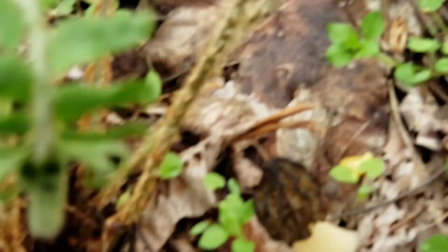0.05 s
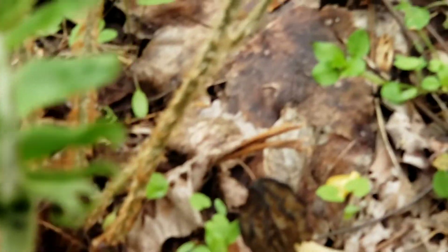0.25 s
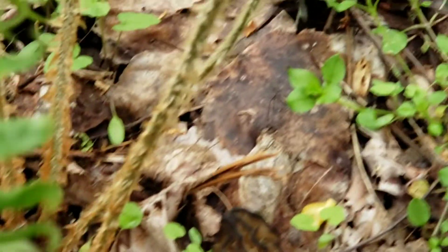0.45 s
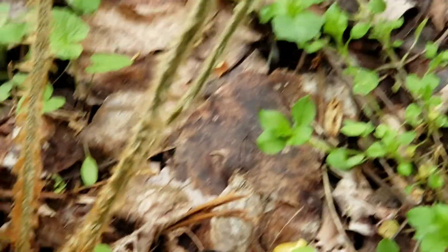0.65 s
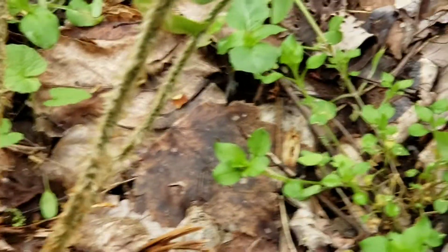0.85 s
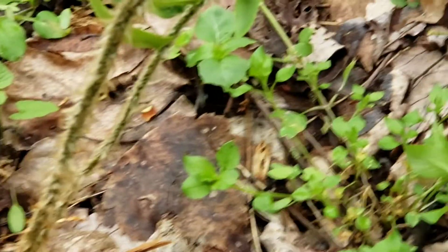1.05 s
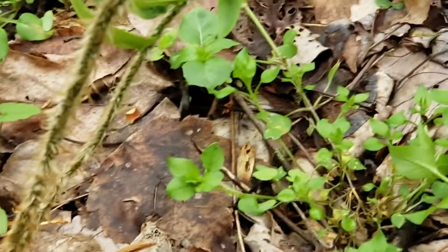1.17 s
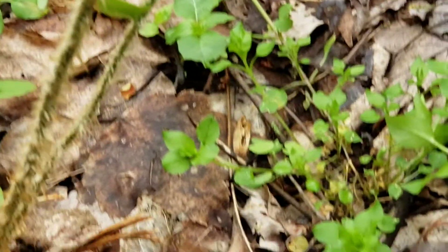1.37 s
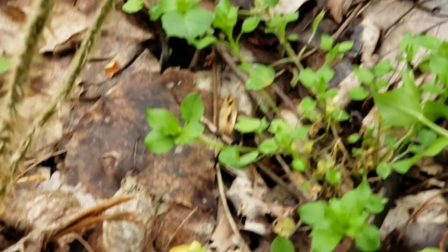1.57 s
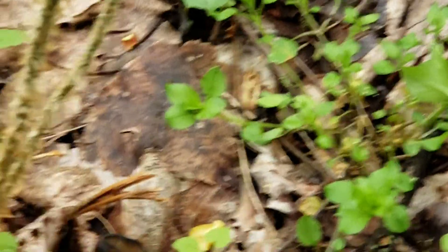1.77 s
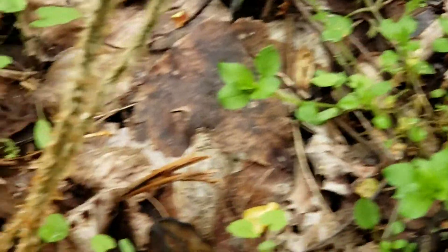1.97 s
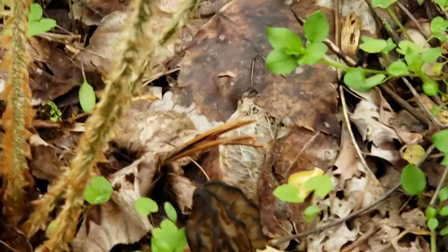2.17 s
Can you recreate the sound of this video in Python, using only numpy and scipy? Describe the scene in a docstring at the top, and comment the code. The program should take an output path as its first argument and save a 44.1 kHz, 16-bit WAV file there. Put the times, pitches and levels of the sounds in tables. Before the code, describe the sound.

Close, crisp rustling of dry leaf litter as a person shifts their weight: a few light ticks, then swelling crunches with bright snaps and dull stick cracks, over very quiet outdoor forest air.

```python
"""Dry leaf litter and low plants, close to the microphone, as someone shifts their weight through them.
The leaves crumple in thousands of tiny random clicks a second, each ringing a bank of short resonances;
stalks and brittle leaves snap out of the rustle as timed cracks with splinters and a short ring.
Shaped noise gives the soft ground underfoot, the dull sticks and the rumble of the hand-held microphone.
Behind lies quiet forest air, with a faint, thin, far tone that fades early on."""
import sys
import numpy as np
from scipy import signal
from scipy.fft import rfft, irfft, next_fast_len
from scipy.io import wavfile

SR = 44100
rng = np.random.default_rng(int(sys.argv[2]) if len(sys.argv) > 2 else 0)


def put_to_file(sound):
    """Save the sound as 16-bit audio at rate SR, in the file named by the first command-line argument."""
    columns = np.atleast_2d(sound).T  # one column per channel
    safe = np.clip(columns, -1, 1)
    whole_steps = np.round(safe * 32767)
    wavfile.write(sys.argv[1], SR, whole_steps.astype(np.int16))


N = 97769
TIME = np.arange(N) / SR   # seconds

# Level of the crumpling leaves, before trims and side colour. Each row: time in seconds, crunch in dB,
# treble at the left in dB, treble at the right in dB.
CRUMPLE_LEVEL = [(0.0, -46.5, -48.5, -44), (0.01, -60.5, -58.5, -60), (0.3, -54.5, -49, -50),
                 (0.34, -56.5, -54.5, -53), (0.41, -54, -52, -53), (0.43, -55.5, -57, -56),
                 (0.47, -55.5, -55, -58), (0.5, -49, -51.5, -48), (0.61, -62.5, -56, -54),
                 (0.65, -56.5, -59, -57), (0.7, -41, -46.5, -41), (0.73, -47, -55, -42),
                 (0.77, -43.5, -43, -47), (0.82, -40.5, -38.5, -28), (0.84, -42.5, -41.5, -34),
                 (0.91, -38.5, -37.5, -36.5), (0.98, -40, -40, -37), (1.07, -36, -40.5, -35),
                 (1.19, -43.5, -40.5, -39), (1.25, -35, -40.5, -36), (1.33, -45, -46, -47),
                 (1.43, -44, -48, -43), (1.58, -32.5, -35.5, -33), (1.69, -49.5, -54, -49),
                 (1.76, -49, -47, -47), (1.8, -41, -49.5, -40), (1.94, -45, -43.5, -39.5),
                 (1.97, -33, -31.5, -42), (2.03, -32.5, -43.5, -47), (2.04, -42.5, -40, -32),
                 (2.1, -41, -46, -37), (2.2, -52.5, -56, -50)]
FRACTURES_PER_S, FRACTURE_SPREAD_DB = 2600, 3
CLUMP_DB, CLUMP_RATE_HZ = 2.5, 128   # depth and speed at which the fractures bunch together
CRUNCH_TRIM_DB, TREBLE_TRIM_DB = -2.33, -2.45
SLIDE_DB = -2.5   # smooth sliding of leaf on leaf against the fractures

# How a leaf fracture is spread over pitch
CRUNCH_TOP_HZ, TREBLE_FROM_HZ = 5370, 10200   # the two levels blend in between
BAND_SPREAD_DB = 3.5   # every crumpling fracture favours other pitches
PATCH_DB, PATCH_RATE_HZ = 1.97, 20.5   # the colour shifts as different leaves take the load
SCATTER_DB, SCATTER_S = -5.5, 0.0024   # sound scattered in the litter after each click; its decay time
SAME_SIGN = .65   # likeness of the click's sign at left and right

# Stalks and brittle leaves that snap, before trims and colour. Each row: start in seconds,
# pitch of the ring in Hz, crunch in dB, treble at the left in dB, treble at the right in dB.
SNAPS = [(0.1842, 4860, -21, -19, -14), (0.3677, 4440, -28, -25, -25), (0.4226, 4070, -31, -23, -28),
         (0.4364, 3750, -10.5, -8, -0.5), (0.4392, 3650, -16.5, -18, -21), (0.549, 7000, -25, -21.5, -16),
         (0.6323, 4100, -19.5, -19.5, -11), (0.651, 7460, -18, -20, -12.5), (0.7259, 2540, -10.5, -10, -7),
         (0.7412, 7820, -24, -18, -11), (0.7633, 4500, -5, -3.5, -1), (0.7684, 2200, -13, -27, -16),
         (0.8124, 7710, -11, 2.5, 1), (0.8143, 4130, -10, -4, -8), (0.817, 2670, -7, -11, -4),
         (0.8593, 7820, -20, -10.5, -19), (0.914, 7900, -14, -7, -4), (0.9359, 7900, -17, -2, -2),
         (0.9524, 4000, -8, -16, -8), (1.0061, 8300, -7, -12, 1), (1.0097, 7620, -16, -1.5, -7),
         (1.0461, 4410, -16, -9, -11), (1.0603, 8000, -5, -0.5, -1), (1.2667, 1950, -11.5, -19, -15),
         (1.2914, 3820, -9.5, -19, -11), (1.3029, 3900, -14, -17, -21), (1.3555, 3920, -14.5, -37, -17),
         (1.3731, 7800, -18, -15.5, -16), (1.4494, 7400, -13.5, -20, -18), (1.4751, 4030, -15, -22, -21),
         (1.7921, 2480, -23, -8, -4), (1.8519, 5000, -4.5, -7, -4), (1.8658, 4760, -10, -34, -6.5),
         (1.9651, 2000, -7, -5, 7.5), (1.973, 8030, -21, -21, -3), (1.993, 2070, -16, -7, -7),
         (2.0053, 3100, -1.5, -1, -2), (2.0114, 7100, -6.5, 2.5, 12), (2.0344, 3070, -5, -3.5, 6),
         (2.1002, 4360, -10, -14, -11), (2.1381, 4270, -25, -21, -6), (2.1614, 1870, -11.5, -34, -9)]
# Colour of the snaps. Each row: frequency in Hz, level in dB.
SNAP_COLOUR = [(500, -3), (1300, -5), (2100, -0.5), (3100, -3), (4000, 2), (5300, 3), (7000, 1), (10000, 0),
               (16000, .5)]
SNAP_CRUNCH_TRIM_DB, SNAP_TREBLE_TRIM_DB = -5.5, -4.5
FORECRACK_DB, FORECRACK_S = -12, .0012   # a first fibre gives this long ahead of the snap
SPLINTERS, SPLINTER_DB, SPLINTER_S = 5, -6, .0011   # smaller cracks per snap; level; mean delay
RING_DB, RING_S = -22, 0.0038   # ring against the snap's crunch level; time until 60 dB down

# Colour of the leaves as each side hears them. Each row: frequency in Hz, level in dB.
LEFT_COLOUR = [(500, -16.5), (800, -11.5), (1100, -5), (1550, -8.5), (2100, -2.5), (3100, -2), (5600, -.5),
               (7700, 2), (9300, 1), (11000, 6.5), (12500, 12.5), (14200, 12.5), (15800, 1)]
RIGHT_COLOUR = [(500, -25), (800, -16), (1100, -5.5), (1600, -1), (2100, 4.5), (3200, 2.5), (4300, 4.5),
                (5600, -3.5), (7000, -6), (8200, -4), (9700, -2.5), (12500, -5), (14200, -6), (15800, 4)]
RIGHT_LAG_S = 0.0003736   # the litter reaches the right side this much later

# Crushing of the lower layers of litter, before trim and pan. Each row: time in seconds, level in dB.
DEEP_LEVEL = [(0.0, -65.5), (0.3, -86), (0.33, -61), (0.48, -77), (0.51, -61), (0.59, -92), (0.7, -80),
              (0.71, -67), (1.02, -65), (1.09, -50), (1.19, -57.5), (1.25, -51), (1.27, -71), (1.44, -65),
              (1.57, -54.5), (1.76, -63.5), (1.78, -46.5), (1.83, -57.5), (1.86, -52), (1.89, -60),
              (1.98, -48.5), (2.22, -65)]
# Colour of the deep crunch. Each row: frequency in Hz, level in dB.
DEEP_COLOUR = [(300, -24), (600, -12), (850, -3), (1100, 1), (1400, -1), (1800, -4.5), (2400, -8.5),
               (4000, -31)]
DEEP_PER_S, DEEP_SPREAD_DB = 1800, 5
DEEP_TRIM_DB, DEEP_PAN_DB = 1, -1   # the pan is added at the left, taken off at the right

# The foot pressing the soft ground, before trim and pan. Each row: time in seconds, level in dB.
PRESS_LEVEL = [(0.0, -65), (0.23, -74), (0.31, -73.5), (0.34, -63.5), (0.49, -68.5), (0.5, -61),
               (0.59, -74.5), (0.72, -64.5), (0.83, -56.5), (0.86, -58), (1.09, -51.5), (1.19, -57.5),
               (1.49, -55.5), (1.51, -50.5), (1.58, -53), (1.71, -65.5), (1.77, -63), (1.94, -58),
               (2.0, -52.5), (2.2, -67)]
# Colour of the ground. Each row: frequency in Hz, level in dB.
GROUND_COLOUR = [(60, -4.5), (130, 0.5), (250, -0.5), (450, 0.5), (650, -4), (1000, -11.5), (1600, -18.5),
                 (3000, -42)]
PRESS_TRIM_DB, PRESS_PAN_DB = -1.5, 1.35

# Damp sticks crunching under the litter. Each row: start in seconds, pitch in Hz, level in dB.
DULL_CRUNCHES = [(.33, 866, -62), (.715, 190, -60.5), (1.085, 1390, -48), (1.32, 334, -59),
                 (1.365, 336, -56), (1.655, 650, -58), (1.775, 850, -51), (1.79, 1400, -53),
                 (1.86, 189, -58)]
DULL_ATTACK_S, DULL_DECAY_S, DULL_Q = 0.0033, 0.02, 4.3

# Handling of the microphone. Each row: time in seconds, level in dB.
HANDLING_LEVEL = [(0.0, -77), (0.29, -69), (0.31, -60), (0.5, -73.5), (0.76, -68), (0.82, -78),
                  (1.08, -57.5), (1.12, -69), (1.33, -56), (1.35, -63), (1.51, -80), (1.52, -55),
                  (1.65, -59.5), (1.76, -73.5), (2.01, -53.5), (2.2, -69.5)]
# Colour of the handling rumble. Each row: frequency in Hz, level in dB.
RUMBLE_COLOUR = [(15, -32), (30, -18), (55, 0.5), (85, 0.5), (130, -10), (250, -29), (600, -47)]

# Faint, thin tone far away, fading. Each row: time in seconds, level in dB.
FAR_TONE_LEVEL = [(0, -67.5), (.38, -72), (.55, -93), (2.2, -93)]
FAR_TONE_HZ, FAR_TONE_WIDTH_HZ = 1305, 66

# Colour of the distant forest air. Each row: frequency in Hz, level in dB.
AIR_COLOUR = [(30, 2), (90, -5), (250, -19), (450, -9), (750, -24), (1150, -5), (1500, -7), (2200, 1),
              (2700, -9), (3300, -15.5), (8000, -15), (16000, -15)]
AIR_DB, AIR_PAN_DB = -65.5, -5.2

CUTOFF_HZ = 16100


def from_db(db):
    """Decibels to gain."""
    return 10 ** (np.asarray(db) / 20)


def rms_one(x):
    """Scale to unit power."""
    return x / np.sqrt(np.mean(x ** 2) + 1e-20)


def in_time(rows):
    """The level columns of a curve, sample by sample."""
    seconds, *columns = np.transpose(rows)
    return np.array([np.interp(TIME, seconds, column) for column in columns])


def pan(db):
    """Decibels to add at the left and take off at the right."""
    return db * np.array([[1], [-1]])


def later_at_right(x):
    """The same sound, delayed by its longer way to the right side."""
    return np.interp(TIME - RIGHT_LAG_S, TIME, x)


def drift(rate_hz):
    """Slow chance with rms 1: noise through two equal low-passes, taken once they have settled."""
    r = np.exp(-2 * np.pi * rate_hz / SR)
    slow = signal.lfilter([1], [1, -2 * r, r * r], rng.standard_normal(2 * N))
    return rms_one(slow[N:])


def colour(x, points):
    """Causal (minimum-phase) filter that follows a spectrum, so that clicks stay sharp."""
    size = 2 * next_fast_len(N)
    hz, db = np.transpose(points)
    grid = np.maximum(np.arange(size // 2 + 1) * SR / size, 1)
    gain = from_db(np.interp(np.log(grid), np.log(hz), db))
    cepstrum = irfft(np.log(gain))
    # folding the cepstrum onto positive times gives the minimum phase
    cepstrum[1:size // 2] *= 2
    cepstrum[size // 2 + 1:] = 0
    response = np.exp(rfft(cepstrum))
    return irfft(rfft(x, size) * response)[..., :N]


def stereo_noise(points, alike):
    """Coloured noise, partly shared by both sides; rms 1."""
    mid, side = rng.standard_normal((2, N))
    mid, side = np.sqrt(1 + alike) * mid, np.sqrt(1 - alike) * side
    return rms_one(colour(np.array([mid + side, mid - side]), points))


def resonance(x, hz, width_hz):
    """One resonance, gain 1 at its top."""
    r = np.exp(-np.pi * width_hz / SR)
    zeros = np.array([1, 0, -1]) * (1 - r * r) / 2
    poles = [1, -2 * r * np.cos(2 * np.pi * hz / SR), r * r]
    return signal.lfilter(zeros, poles, x)


def scatter(clicks):
    """Level of the few milliseconds of diffuse sound behind every click."""
    r = np.exp(-1 / (SCATTER_S * SR))
    power = signal.lfilter([1 - r], [1, -r], clicks ** 2 + 1e-18)
    return from_db(SCATTER_DB) * np.sqrt(power)


def fractures(crunch, treble, spread_db, slide_crunch=0, slide_treble=0):
    """Each click rings a bank of short leaf resonances at its own strengths and signs; sliding adds noise."""
    edges = np.geomspace(400, 17000, 14)   # band edges in Hz
    haze_crunch = np.hypot(scatter(crunch), slide_crunch)
    haze_treble = np.hypot(scatter(treble), slide_treble)
    out = np.zeros((2, N))
    for low, high in zip(edges, edges[1:]):
        centre = np.sqrt(low * high)
        up = np.log(centre / CRUNCH_TOP_HZ) / np.log(TREBLE_FROM_HZ / CRUNCH_TOP_HZ)
        up = np.clip(up, 0, 1)   # 0: crunch level, 1: treble level
        strength = rms_one(from_db(spread_db * rng.standard_normal(N))) * rng.choice([-1, 1], N)
        right_sign = np.where(rng.random(N) < (1 + SAME_SIGN) / 2, 1, -1)
        sides = np.array([np.ones(N), right_sign])
        drive = crunch ** (1 - up) * treble ** up * strength * sides
        drive += haze_crunch ** (1 - up) * haze_treble ** up * rng.standard_normal((2, N))
        drive *= rms_one(from_db(PATCH_DB * drift(PATCH_RATE_HZ)))
        band = signal.butter(2, [low, high], "band", fs=SR, output="sos")
        out += signal.sosfilt(band, drive)
    return out


def crumpling():
    """Clumps of tiny fractures, mostly small and a few large, over the hiss of sliding leaves."""
    level = in_time(CRUMPLE_LEVEL)
    born = rng.random(N) < FRACTURES_PER_S / SR
    clumps = rms_one(from_db(CLUMP_DB * drift(CLUMP_RATE_HZ)))
    sizes = from_db(FRACTURE_SPREAD_DB * np.minimum(rng.exponential(1, N), 4.5))
    clicks = clumps * rms_one(born * sizes)
    crunch = from_db(level[0] + CRUNCH_TRIM_DB)
    treble = from_db(level[1:] + TREBLE_TRIM_DB)
    slide = from_db(SLIDE_DB) * clumps
    return fractures(crunch * clicks, treble * clicks, BAND_SPREAD_DB, crunch * slide, treble * slide)


def snapping():
    """A first fibre gives, then comes one sharp crack, and the piece tears on in a few splinters."""
    clicks = np.zeros((3, N))   # crunch, treble at the left, treble at the right
    delays = SPLINTER_S * rng.exponential(1, (len(SNAPS), SPLINTERS))
    for (start, _, *db), later in zip(SNAPS, delays):
        crack = from_db(db)
        clicks[:, int(start * SR)] += crack
        clicks[:, int((start - FORECRACK_S) * SR)] += crack * from_db(FORECRACK_DB)
        for delay in later:
            clicks[:, min(int((start + delay) * SR), N - 1)] += crack * from_db(SPLINTER_DB)
    crunch = from_db(SNAP_CRUNCH_TRIM_DB) * clicks[0]
    treble = from_db(SNAP_TREBLE_TRIM_DB) * clicks[1:]
    return colour(fractures(crunch, treble, spread_db=1.5), SNAP_COLOUR)


def snap_rings():
    """Each broken piece rings for a moment at its own pitch, a sine that decays exponentially."""
    out = np.zeros(N)
    for start, hz, crunch_db, *_ in SNAPS:
        first = int(start * SR)
        age = TIME[:min(SR // 20, N - first)]
        envelope = from_db(crunch_db + RING_DB - 60 * age / RING_S)
        out[first:first + len(age)] += envelope * np.sin(2 * np.pi * hz * age)
    return out


def leaves():
    """The leaves lie to the left: they reach the right side later, and each side has its own colour."""
    left, right = crumpling() + snapping() + snap_rings()
    return np.array([colour(left, LEFT_COLOUR), later_at_right(colour(right, RIGHT_COLOUR))])


def deep_crunch():
    """Muffled fractures in the packed leaves below: coloured random clicks, with diffuse noise around."""
    sizes = from_db(DEEP_SPREAD_DB * np.minimum(rng.exponential(1, N), 4)) * rng.choice([-1, 1], N)
    born = rng.random(N) < DEEP_PER_S / SR
    direct = rms_one(colour(sizes * born, DEEP_COLOUR))
    diffuse = from_db(-5) * stereo_noise(DEEP_COLOUR, alike=0)
    both = np.array([direct, later_at_right(direct)]) + diffuse
    return from_db(in_time(DEEP_LEVEL) + DEEP_TRIM_DB + pan(DEEP_PAN_DB)) * rms_one(both)


def ground():
    """Damp litter gives under the foot in soft crunches: low noise of quickly uneven level."""
    level = in_time(PRESS_LEVEL)[0] + PRESS_TRIM_DB + 2.0 * drift(62)
    return from_db(level + pan(PRESS_PAN_DB)) * stereo_noise(GROUND_COLOUR, alike=0.79)


def dull_crunches():
    """Soft wood gives way: a short, rough burst of noise in one broad resonance."""
    out = np.zeros(N)
    for start, hz, db in DULL_CRUNCHES:
        age = np.maximum(TIME - start, 0)
        envelope = (1 - np.exp(-age / DULL_ATTACK_S)) * np.exp(-age / DULL_DECAY_S)
        rough = rms_one(resonance(rng.standard_normal(N), hz, hz / DULL_Q))
        out += from_db(db) * envelope / envelope.max() * rough
    return np.array([out, later_at_right(out)])


def handling():
    """Low rumble of the hand-held microphone: deep noise, nearly the same at both sides."""
    level = in_time(HANDLING_LEVEL)[0] + 0.5 * drift(12)
    return from_db(level) * stereo_noise(RUMBLE_COLOUR, alike=0.92)


def far_tone():
    """A narrow, wavering band of sound in the distance: noise through two resonances."""
    band = resonance(rng.standard_normal((2, N)), FAR_TONE_HZ, FAR_TONE_WIDTH_HZ)
    band = resonance(band, FAR_TONE_HZ, 2 * FAR_TONE_WIDTH_HZ)
    return from_db(in_time(FAR_TONE_LEVEL)) * rms_one(band)


def forest_air():
    """Quiet, steady forest air: wide coloured noise, stronger at the right."""
    return from_db(AIR_DB + pan(AIR_PAN_DB)) * stereo_noise(AIR_COLOUR, alike=.2)


def scene():
    """Leaves, litter and ground close by, handling at the microphone, the forest behind."""
    close = leaves() + deep_crunch() + ground() + dull_crunches()
    return close + handling() + far_tone() + forest_air()


def record(dry):
    """The top is cut steeply by an elliptic low-pass."""
    low_pass = signal.ellip(10, .2, 75, CUTOFF_HZ, fs=SR, output="sos")
    return signal.sosfilt(low_pass, dry)


dry = scene()
out = record(dry)
put_to_file(out)
```